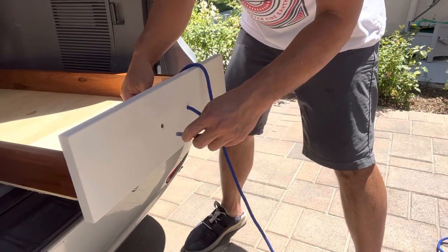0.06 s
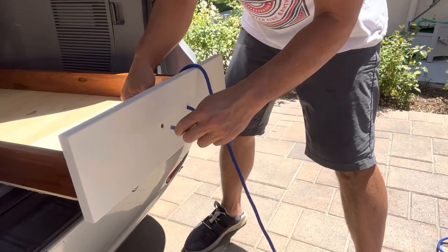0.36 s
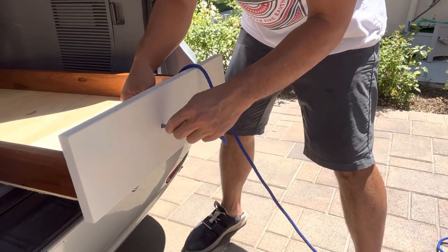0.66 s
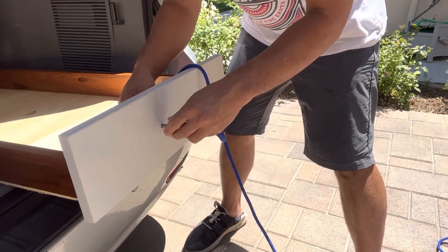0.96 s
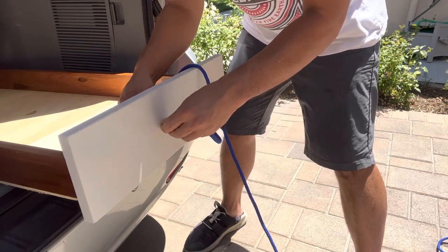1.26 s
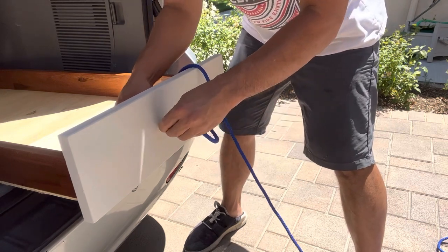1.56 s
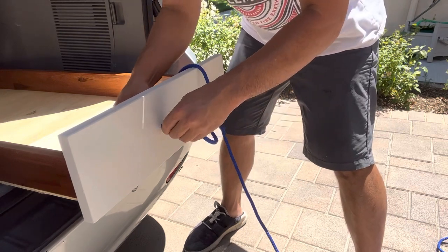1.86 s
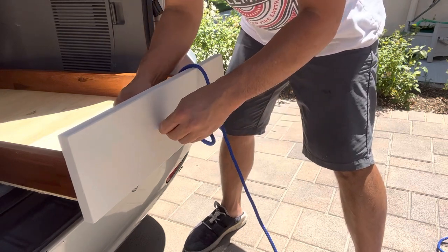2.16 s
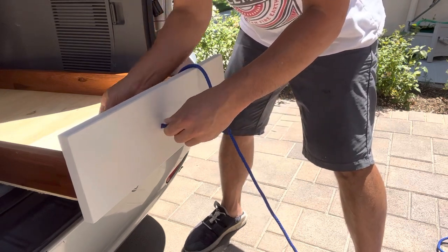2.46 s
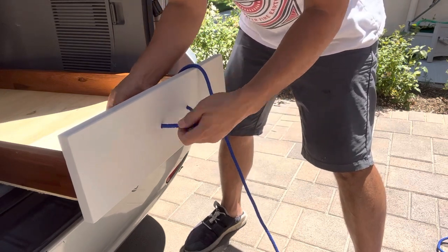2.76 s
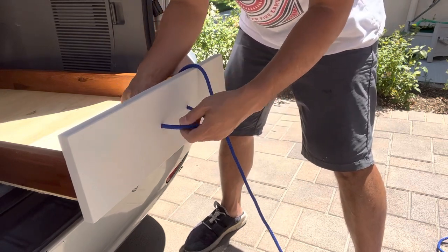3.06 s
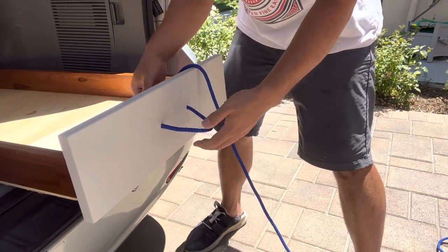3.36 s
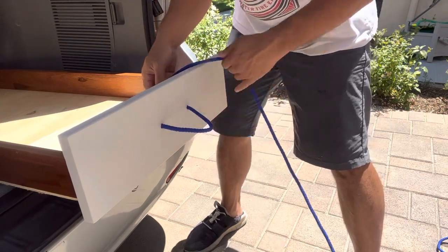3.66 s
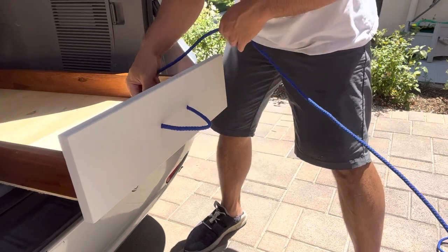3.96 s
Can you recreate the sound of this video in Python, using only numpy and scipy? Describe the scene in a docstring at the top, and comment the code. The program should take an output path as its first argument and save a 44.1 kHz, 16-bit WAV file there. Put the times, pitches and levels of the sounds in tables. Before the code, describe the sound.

Cord rasping through a hole in a board, with light knocks over distant traffic rumble.

```python
"""Cord through a painted board

Outdoors, close to a two-port microphone, a braided cord is poked and pulled through holes in a board.
The braid rasps on the rim of the hole and sets the board ringing; fingers slide on the cord, its hard
tip ticks, and hands knock the panel. Far behind, traffic rumbles and engines hum."""
import sys
import numpy as np
from scipy import signal
from scipy.fft import rfft, irfft
from scipy.io import wavfile
from scipy.ndimage import uniform_filter1d

SR = 44100
rng = np.random.default_rng(int(sys.argv[2]) if len(sys.argv) > 2 else 0)


def pcm_store(signal):
    """Save signal as 16-bit PCM."""
    levels = np.round(np.clip(np.atleast_2d(signal), -1, 1) * 32767)
    wavfile.write(sys.argv[1], SR, levels.astype(np.int16).T)


N = 176400
T = np.arange(N) / SR
BLOW_S = .01  # a tick's or knock's level is its energy spread over this time

# Spectrum of far traffic and open air: f/Hz, relative level/dB
TRAFFIC_SPECTRUM = [(34, -17), (52, -3.5), (75, 3.5), (105, -7), (135, -7), (190, -16), (270, -13.5),
                    (370, -21), (500, -27), (1050, -31), (2200, -45.5), (9000, -63), (15500, -58.5)]
# Likeness of that background at the two ports: f/Hz, correlation
TRAFFIC_LIKENESS = [(100, 0.89), (200, 0.88), (380, 0.36), (700, 0)]
# Distant engine notes, a drone, a whine and a low throb: t/s, f/Hz, level/dB
ENGINE_DRONE = [(0, 330, -50), (2.8, 332.4, -50.5), (3.7, 312.8, -48.5), (4, 307, -50)]
ENGINE_WHINE = [(0, 368, -57.5), (1.7, 394, -52.5), (3.2, 396, -72.5)]
ENGINE_THROB = [(0, 90.46, -52.5), (2.55, 94.52, -33.5), (2.698, 86.06, -46), (2.9, 78.43, -26.5),
                (3.25, 72.74, -42.5), (3.5, 68.85, -24.5), (3.7, 70.6, -36.5)]
# Spectrum of the reflections off hands, panel and ground: f/Hz, relative level/dB
REFLECTIONS = [(4000, 5.5), (7000, -3.5), (10000, -52)]
# Hard tip or braid catching on the board: t/s, level/dB, brightness/Hz
CORD_TICKS = [(.481, -48.5, 6840), (0.5913, -50, 8900), (.632, -41.5, 5000), (.646, -44, 8000),
              (0.652, -43.5, 7000), (.706, -52, 15000), (1.137, -45, 4500), (1.284, -55.5, 12000),
              (1.548, -59, 15000), (1.645, -52, 4970), (2.378, -49, 5500), (2.6737, -45, 4400),
              (2.709, -57, 5520), (2.749, -42, 11000), (2.797, -46, 6000), (3.6934, -40.5, 6500),
              (3.7525, -34, 4700)]
# Spectrum shared by those ticks: f/Hz, relative level/dB
TICK_SPECTRUM = [(1200, 3.5), (3200, 0.5), (6800, 5.5), (8600, -5.5), (15500, 4)]
# Hands or tip bumping the panel: t/s, relative level/dB, brightness/Hz
PANEL_KNOCKS = [(0.481, -47.5, 5000), (.485, -44.5, 4530), (.633, -49, 3000), (1.17, -39.5, 1200),
                (1.174, -34.5, 1980), (1.189, -38.5, 594), (1.203, -45, 600), (1.284, -55, 5000),
                (1.5, -38, 2000), (1.646, -51, 3000), (3.05, -40.5, 1930), (3.484, -35, 1730),
                (3.497, -33.5, 400), (3.514, -34, 500), (3.989, -40, 700)]
# Clear modes of the board: f/Hz, relative level/dB, t60/s
BOARD_MODES = [(258, 2.5, 0.22), (330, -1, 0.1), (377.7, 3, 0.28), (440.8, 0.5, 0.28), (612, 0.5, 0.096),
               (888.5, 0, 0.051), (1017, 3.5, 0.088), (1179, -4, 0.091), (1438, 4.5, 0.022),
               (1783, -2.5, 0.049), (1867, -0.5, 0.024), (2561, -5.5, 0.046), (2900, -11.5, 0.061)]
# Spectrum of the board's dense ring and clack: f/Hz, relative level/dB
WOOD_SPECTRUM = [(100, -34.5), (280, 9), (700, 0), (1250, 0.5), (1900, -14), (8000, -26)]
# Cord dragged through a hole, or over the board's top edge, where it sounds thinner, with less bass:
# t/s, rise/s, fall/s, rasp level/dB, board level/dB, board low cut/Hz
CORD_PULLS = [(0.599, 0.049, 0.25, -57.5, -44, 200), (0.848, 0.06, 0.13, -63, -45, 300),
              (1.085, 0.042, 0.12, -46.5, -41.5, 392), (1.436, 0.044, 0.09, -53, -42, 249),
              (2.095, 0.053, 0.097, -51.5, -40.5, 197), (2.203, 0.033, 0.21, -49.5, -41, 150),
              (2.344, 0.11, 0.079, -31.5, -30, 310), (2.471, 0.074, 0.39, -54.5, -49.5, 244),
              (2.631, 0.088, 0.089, -40.5, -38, 414), (2.709, 0.08, 0.11, -39.5, -41.5, 417),
              (3.032, 0.054, 0.044, -50, -51.5, 505), (3.497, 0.038, 0.033, -37.5, -30, 260),
              (3.545, 0.081, 0.15, -48.5, -36.5, 1130), (3.727, 0.072, 0.08, -39.5, -38.5, 809.5),
              (3.851, 0.0047, 0.061, -42.5, -33.5, 805)]
# Spectrum of braid on the rim: f/Hz, relative level/dB
RASP_SPECTRUM = [(300, -21.5), (1500, -1), (2600, 0), (3600, -2), (5200, 2.5), (7500, 6), (9200, -3.5),
                 (15500, -1)]
# Fingers sliding along the cord: t/s, rise/s, fall/s, level/dB, zip f/Hz
FINGER_SLIDES = [(0.63, 0.025, 0.17, -52.5, 7050), (.76, 0.21, 0.28, -51.5, 10000),
                 (1.248, 0.037, 0.087, -54.5, 8900), (1.532, 0.11, 0.06, -54.5, 8100),
                 (3.13, 0.097, 0.086, -61.5, 4760)]
# Spectrum of skin on braid: f/Hz, relative level/dB
SKIN_SPECTRUM = [(500, -7), (2000, 2.5), (4200, 4.5), (7000, 17.5), (11500, 4.5), (15500, 1)]


def amp(db):
    """Decibels to gain."""
    return 10 ** (np.asarray(db) / 20)


def unit(x):
    """Scales to rms 1."""
    return x / np.sqrt(np.mean(x ** 2) + 1e-20)


def read(points, hz):
    """Reads a spectrum on a log-frequency axis."""
    f, value = np.transpose(points)
    return np.interp(np.log(hz + 1), np.log(f), value)


def colour(x, points):
    """Causal filter of unit energy with the given spectrum."""
    log_gain = np.log(amp(read(points, abs(np.fft.fftfreq(2048, 1 / SR)))))
    minimum_phase = np.exp(np.conj(signal.hilbert(log_gain)))
    taps = np.fft.ifft(minimum_phase).real[:1024]
    taps /= np.linalg.norm(taps)
    return signal.fftconvolve(np.atleast_2d(x), taps[None], axes=1)[:, :x.shape[-1]]


def wander(rate_hz):
    """Random drift of rms 1, mostly slower than rate_hz."""
    rolloff = 1 + (np.fft.rfftfreq(N, 1 / SR) / rate_hz) ** 4
    return unit(irfft(rfft(rng.standard_normal(N)) / rolloff, N))


def add(mix, start, sound, response):
    """Adds a sound at its start time, played through a two-channel response."""
    heard = signal.fftconvolve(np.atleast_2d(sound), response, axes=1)
    part = mix[:, round(start * SR):][:, :heard.shape[1]]
    part += heard[:, :part.shape[1]]


def ports(wet_db, lag_s=.000186, in_step_below_hz=5450, t60_s=0.043, size=4096):
    """Path to the microphone: the left port leads in the treble; near surfaces add short reflections."""
    t, hz = T[:size], np.fft.rfftfreq(size, 1 / SR)
    tail = rng.standard_normal((2, size)) * amp(-60 * t / t60_s) * (t > .0005)
    tail /= np.linalg.norm(tail, axis=1, keepdims=True)
    reflected = rfft(tail) * amp(read(REFLECTIONS, hz) + wet_db)
    direct = np.exp(-2j * np.pi * np.maximum(hz - in_step_below_hz, 0) * lag_s * np.array([[-.5], [.5]]))
    common_delay = np.exp(-2j * np.pi * hz * 2 * lag_s)
    return unit(irfft((direct + reflected) * common_delay, size)) / np.sqrt(size)


def far_traffic(level_db=-33.5, patch_db=1.8, flutter_db=.6):
    """Low rumble of far traffic with a thin airy hiss, drifting in patches."""
    frames, hz = N // 512 + 5, np.fft.rfftfreq(2048, 1 / SR)
    noise = rng.standard_normal((frames, len(hz), 5)).T
    left, unrelated = noise[0] + 1j * noise[1], noise[2] + 1j * noise[3]
    likeness = read(TRAFFIC_LIKENESS, hz)[:, None]
    right = likeness * left + np.sqrt(1 - likeness ** 2) * unrelated
    patches = unit(uniform_filter1d(uniform_filter1d(noise[4], size=10, axis=0), size=9, axis=1))
    spectra = np.array([left, right]) * amp(read(TRAFFIC_SPECTRUM, hz)[:, None] + patch_db * patches)
    rumble = signal.istft(spectra, nperseg=2048, noverlap=1536)[1][:, :N]
    return unit(rumble) * amp(level_db + flutter_db * wander(21.0))


def far_engines(hum_hz=117.36, hum_db=-41.5, drift_hz=1.685, waver=0.26):
    """Distant engines, centred: three gliding notes and a held hum, all wavering in pitch and level."""
    out = np.zeros(N)
    for note in (ENGINE_DRONE, ENGINE_WHINE, ENGINE_THROB, [(0, hum_hz, hum_db)]):
        times, hz, db = np.transpose(note)
        cycles = np.cumsum(np.interp(T, times, hz) + drift_hz * wander(5.6)) / SR
        level = amp(np.interp(T, times, db)) * (1 + waver * wander(14))
        out += np.sqrt(2) * level * np.sin(2 * np.pi * cycles)
    return out


def cord_ticks(snap=2.5, decay_s=0.00056, size=256):
    """Each catch of the cord is a snap and a tiny scratch that dies in a millisecond or two."""
    out = np.zeros((2, N))
    for start, db, hz in CORD_TICKS:
        scratch = rng.choice([-1, 1], size) * np.exp(-T[:size] / decay_s)
        scratch[0] = snap
        tick = signal.lfilter(*signal.iirpeak(hz, 1, SR), scratch)
        add(out, start, amp(db) * np.sqrt(BLOW_S * SR) * tick / np.linalg.norm(tick), ports(wet_db=-4.5))
    return colour(out, TICK_SPECTRUM)


def board_ring(dense_db=-6, dense_t60_s=0.13, port_phase_rad=0.93, size=10000):
    """Response of the panel: clear modes over a short dense ring, a little different at each port."""
    t = T[:size]
    phases = rng.choice([-1, 1], len(BOARD_MODES)) * port_phase_rad * np.array([[-1], [1]]) / 2
    modes = sum(amp(db - 60 * t / t60) * np.sin(2 * np.pi * hz * t + phases[:, k:k + 1])
                for k, (hz, db, t60) in enumerate(BOARD_MODES))
    dense = colour(rng.standard_normal((2, size)) * amp(-60 * t / dense_t60_s), WOOD_SPECTRUM)
    return unit(unit(modes) + amp(dense_db) * unit(dense)) / np.sqrt(size)


def panel_knocks(ring, weight_db=4.0, clack_db=-5.5, clack_t60_s=0.027):
    """A blow gives a woody clack and rings the board; the softer the contact, the duller the knock."""
    out, t = np.zeros((2, N)), T[:ring.shape[1]]
    for start, db, hz in PANEL_KNOCKS:
        burst = rng.choice([-1, 1], len(t)) * amp(-60 * t / clack_t60_s)
        clack = unit(colour(burst, WOOD_SPECTRUM)) / np.sqrt(len(t))
        softness = np.exp(-2 * np.pi * hz / SR)
        blow = signal.lfilter([1 - softness], [1, -softness], ring + amp(clack_db) * clack)
        # a bright tap hardly drives the low modes
        blow = signal.lfilter(*signal.butter(2, hz * 0.17, "high", fs=SR), blow)
        add(out, start, amp([db + weight_db]) * np.sqrt(BLOW_S * SR), blow / np.linalg.norm(blow[0]))
    return out


def braid_slips(slips_per_s=5700, judder_hz=116, judder_db=1.6, uneven_hz=22, uneven_db=.7):
    """Countless tiny slips of the braid, clumped by judder and by the uneven pull of the hand."""
    slips = (rng.random(N) < slips_per_s / SR) * rng.choice([-1, 1], N)
    return unit(slips * amp(judder_db * wander(judder_hz) + uneven_db * wander(uneven_hz)))


def stroke(slips, start, rise, fall):
    """The slips of one hand movement: it speeds up smoothly, then eases off."""
    ramp = np.interp(T, start + np.cumsum([0, rise, fall]), [0, 1, 0])
    speed = np.sin(np.pi / 2 * ramp) ** 2
    return (slips * speed)[speed > 0]


def cord_pulls(ring):
    """Each pull rasps at the rim and drives the board; reflections off the hands change as they move."""
    slips, rasp, board = braid_slips(), np.zeros((2, N)), np.zeros((2, N))
    for start, rise, fall, rasp_db, board_db, low_hz in CORD_PULLS:
        drag = stroke(slips, start, rise, fall)
        travel = np.linspace(0, 1, len(drag))
        for fade in (travel, travel[::-1]):  # crossfade between two sets of reflections
            add(rasp, start, drag * fade * amp(rasp_db), ports(wet_db=3.5))
        drive = signal.lfilter(*signal.butter(2, low_hz, "high", fs=SR), drag)
        add(board, start, drive * amp(board_db), ring)
    return colour(rasp, RASP_SPECTRUM) + board


def finger_slides(zip_share=0.63, zip_width_hz=1700):
    """Skin on the braid, close up: a soft hiss and a fuzzy zip with its own pitch for each slide."""
    out = np.zeros((2, N))
    hiss = colour(braid_slips(), SKIN_SPECTRUM)[0]
    for start, rise, fall, db, hz in FINGER_SLIDES:
        zipping = unit(signal.lfilter(*signal.iirpeak(hz, hz / zip_width_hz, SR), rng.standard_normal(N)))
        friction = np.sqrt(1 - zip_share) * hiss + np.sqrt(zip_share) * zipping
        add(out, start, amp(db) * stroke(friction, start, rise, fall), ports(wet_db=2.0))
    return out


def scene():
    """Cord, hands and board close to the microphone; traffic and engines far behind."""
    ring = board_ring()
    close = cord_pulls(ring) + finger_slides() + cord_ticks() + panel_knocks(ring)
    return close + far_traffic() + far_engines()


def record(dry, low_cut_hz=32, top_hz=15850):
    """The recorder's low cut and band limit."""
    dry = signal.lfilter(*signal.butter(3, low_cut_hz, "high", fs=SR), dry)
    band_limit = signal.firwin(511, top_hz, window=("kaiser", 9), fs=SR)
    return signal.oaconvolve(dry, band_limit[None], "same")


dry = scene()
out = record(dry)
pcm_store(out)
```